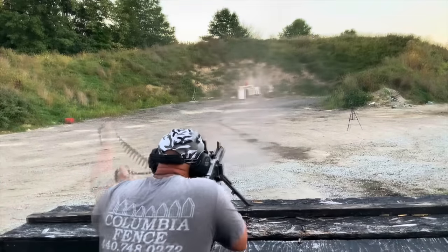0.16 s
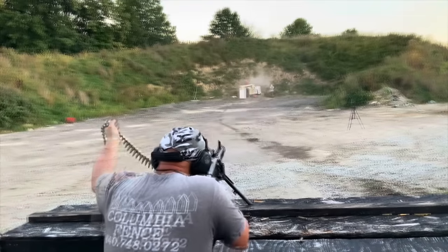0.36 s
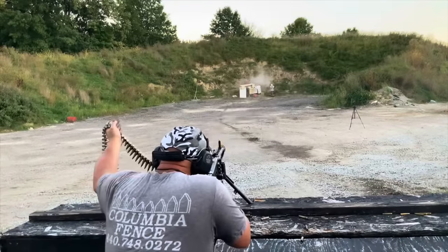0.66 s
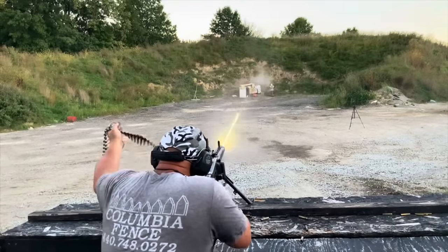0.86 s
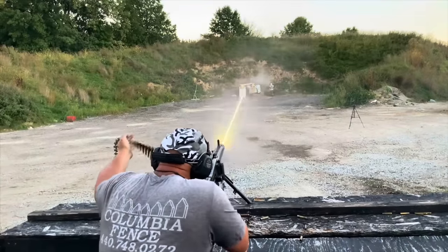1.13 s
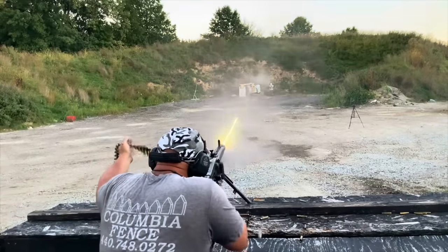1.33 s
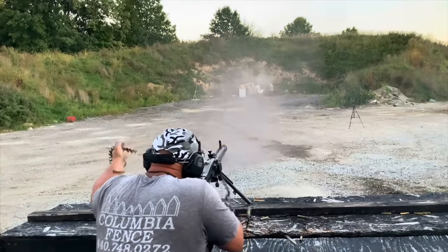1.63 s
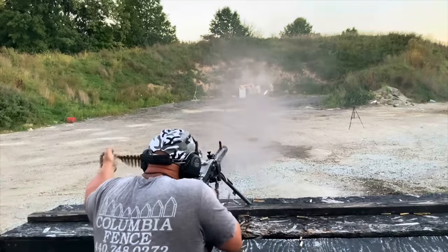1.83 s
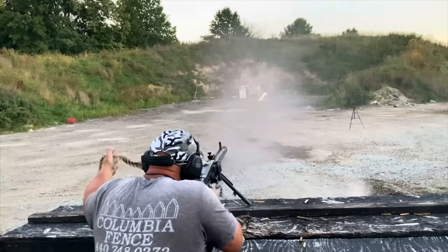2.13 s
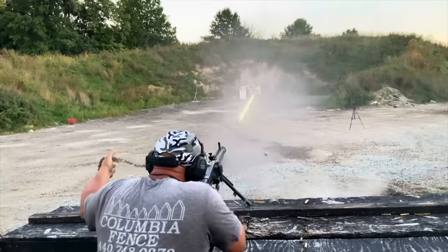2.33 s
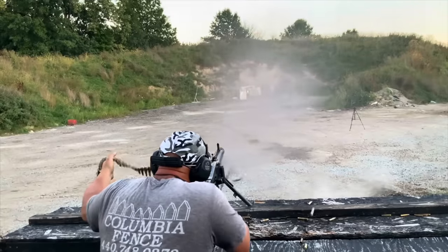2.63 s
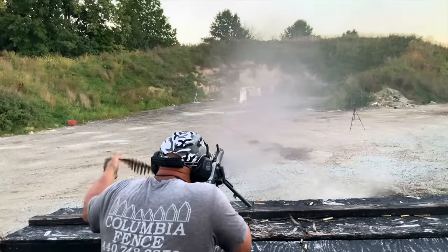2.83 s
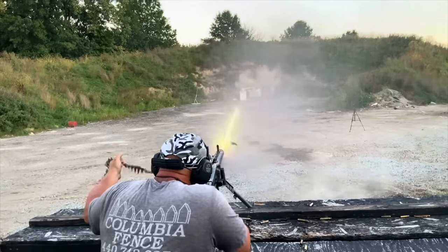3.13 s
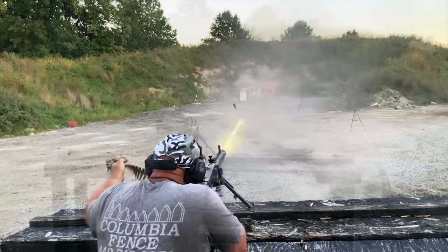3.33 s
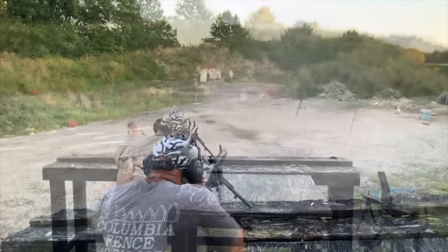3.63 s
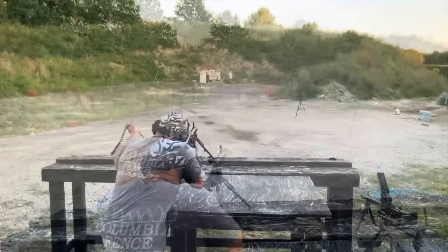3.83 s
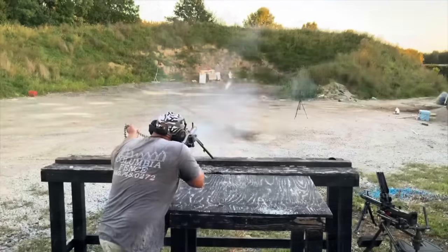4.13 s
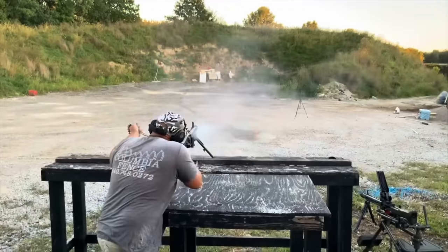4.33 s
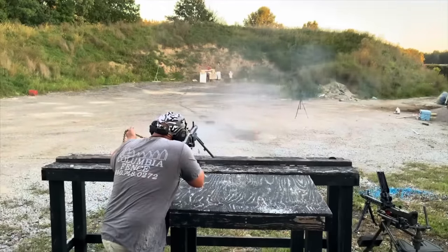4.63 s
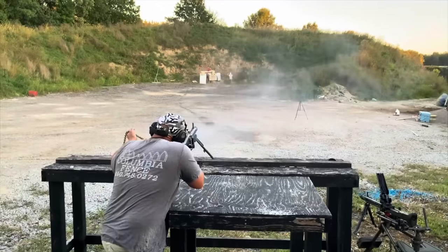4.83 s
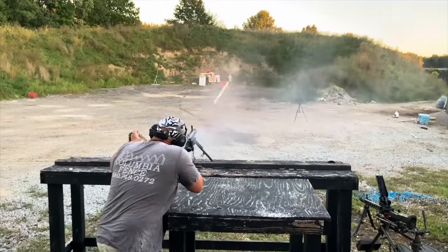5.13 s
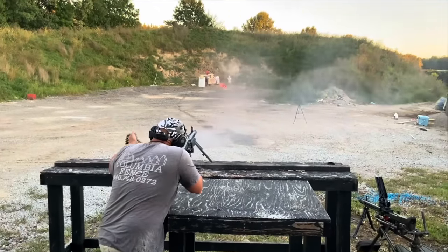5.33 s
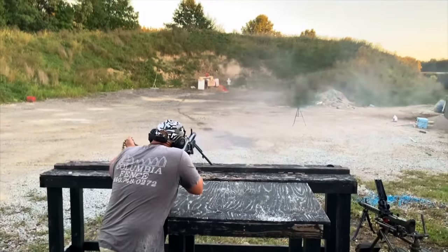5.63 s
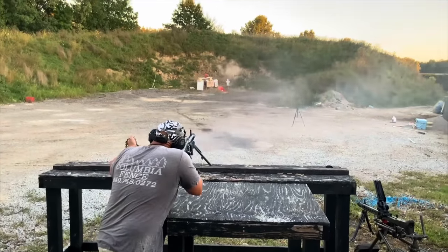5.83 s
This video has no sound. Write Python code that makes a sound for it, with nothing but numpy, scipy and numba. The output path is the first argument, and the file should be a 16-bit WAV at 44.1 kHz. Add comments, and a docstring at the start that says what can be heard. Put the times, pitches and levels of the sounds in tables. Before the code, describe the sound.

Outdoor shooting range, heard in stereo from just behind a belt-fed machine gun. At 0 s the last shot of a burst and its echo off earth banks fade. Small steel clicks come at 0.5 and 0.65 s, then at 0.7 s a sharp crack opens a long burst, about 19 rounds a second. Each round has a hard blast, low thump, gas hiss and bolt clack, with the bench stand ringing; gain control flattens it into a dense, hammering roar, growing thumpier. From 3.2 to 4.2 s it cross-fades to a spot a few metres back, where a short burst ends near 4.25 s. Echoes roll and crackle, with target knocks and a deep swell at 4.5 s. A bright latch snap and clack at 4.8 s lead six quick rounds until 5.1 s, then knocks and a booming swell around 5.3 s. Another click and two rounds begin at 5.85 s.

```python
"""An outdoor range: a belt-fed machine gun fires from a bench, just ahead of us, then from a few metres off.
The end of one close burst cross-fades into a long one, about 19 rounds a second, then into three short bursts.
Each round is shaped noise and decaying sines: a blast that rings the stand, gas hiss and bolt clack.
Scattered noise makes the earth banks' rumble, and struck modes the bullets' knocks on a far target.
Gain control presses each spot into a dense roar over faint open air."""
import sys
import numpy as np
from scipy import signal
from scipy.fft import rfft, irfft, next_fast_len
from scipy.io import wavfile
from scipy.ndimage import uniform_filter1d
from numba import njit

SR = 44100
rng = np.random.default_rng(int(sys.argv[2]) if len(sys.argv) > 2 else 0)


def master(y):
    """Save y as 16-bit WAV."""
    cut = np.clip(np.atleast_2d(y).T, -1, 1)
    pcm = np.round(cut * 32767)  # scale
    wavfile.write(sys.argv[1], SR, pcm.astype(np.int16))


N = 263277
LEAD = SR // 2  # run-in before the heard part, in samples
TOTAL = N + LEAD
TIME = (np.arange(TOTAL) - LEAD) / SR
SIZE = 2 ** 16  # length of a response, in samples
HZ = np.arange(SIZE // 2 + 1) * SR / SIZE
AGE = np.arange(SIZE) / SR  # seconds since the start of a response

TARGET_DELAY_S = .362  # from a shot to its knock on the target
PORT_LAG_S = 34.5 / SR  # treble delay of the left microphone port
TOP_HZ = 15600
ROUND_SPREAD_DB = 1.55  # no two cartridges are quite alike
FIRST_ROUND_DB = -0.5  # the round that opens a close burst is set slightly quieter
LUMP_S = .004  # spacing of the clumps in the banks' reflections
STAND_FADE_DB_PER_S = 1.1  # the stand's notes sink into the roar as a burst goes on

# Most table levels are relative and their layer has its own level; the rumbles' levels are absolute.
# cross-fades between the three stretches of firing: (start [s], length [s])
FADES = [(0.005, 0.57), (3.227, 1)]
# open air: (frequency [Hz], spectrum level [dB])
AIR_COLOUR = [(25, -33), (70, -3), (140, -19), (300, -26), (1000, -21.5), (1900, -31), (3000, -44),
              (15000, -58)]
# deep swells that roll back after a burst: (centre [s], half length [s], level [dB])
RUMBLES = [(.25, 0.11, -33.5), (4.532, 0.11, -26.5), (5.323, 0.13, -23)]
# their bass: (frequency [Hz], spectrum level [dB])
RUMBLE_COLOUR = [(25, -12), (50, -9), (90, 0.5), (150, 3.5), (300, -2), (420, -1.5), (600, -37),
                 (2000, -61)]
# crackling reflections off stones and trunks: (time after the shot [s], level [dB])
CRACKLE_SPAN = [(.02, -40), (.08, -1), (.2, -2), (.35, 0), (.41, -8.5), (.9, -46), (1.4, -90)]
# their tone: (frequency [Hz], spectrum level [dB])
CRACKLE_COLOUR = [(300, -24), (1000, -2), (1650, -2), (2300, -2.5), (2900, -1), (3600, -14), (4600, -5),
                  (15000, -38)]

# the range's answer to one round: (time after the shot [s], level [dB], extra treble [dB])
RANGE_ANSWER = [(0, -5.5, 7.5), (.06, 4.5, -6.5), (.13, 1.5, -40), (.2, -7, 8), (.29, -3, -3.5),
                (.355, 0, -4), (.39, -3.5, -10), (.5, -15, -11), (0.619, -18.5, -15.5), (.9, -30, -14),
                (1.299, -63, -28)]
# tone of the banks' echo: (frequency [Hz], spectrum level [dB])
ECHO_COLOUR = [(15, -60), (25, -36), (108, -9), (223, -8.5), (354, -5), (624, -8.5), (1260, -11),
               (1560, -8), (2280, -10.5), (2760, -10.5), (6920, -10.5), (14800, -26), (16000, -81)]
# separate slaps off the nearer banks: (time after the shot [s], level [dB])
SLAPS = [(0.079, -2), (0.096, -0.5), (.187, -4), (0.263, -0.5)]
# their tone: (frequency [Hz], spectrum level [dB])
SLAP_COLOUR = [(60, -17), (130, -16.5), (250, -8), (390, 1), (550, -17.5), (1500, -34), (3000, -18),
               (6000, -27.5)]
# the struck target: (frequency [Hz], level [dB], t60 [s])
TARGET_MODES = [(1054, -2, 0.05), (1434, -9, 0.078), (1545, -0.5, 0.042), (1716, -1.5, 0.025)]
# bullets that glance off and strike the target again: (time [s], level [dB])
RICOCHETS = [(4.3235, -8), (4.393, -8), (4.456, -7.5), (4.553, 0), (5.247, -1.5), (5.303, 1), (5.359, 3.5)]

# trigger, belt and the bolt running forward, at each spot: (time [s], level [dB], t60 [s])
CLOSE_CLICKS = [(0.497, -22, 0.097), (0.636, -30, 0.19), (0.660, -0.5, 0.49)]
BACK_CLICKS = [(4.789, -12, 0.17), (4.83, 2.5, 0.11), (5.80, -12, 0.19), (5.838, -2, 0.45)]
# tone of the gun's steel: (frequency [Hz], spectrum level [dB])
STEEL_COLOUR = [(100, -47), (700, 1.5), (2000, -3), (5000, -1.5), (9000, 4), (15000, -0.5)]
# resonances of that steel: (frequency [Hz], width [Hz], lift [dB])
STEEL_RINGS = [(3400, 250, -3), (4700, 600, 8), (10300, 780, 1)]
# the feed latch snaps before a burst: (time [s], level [dB])
LATCHES = [(4.835, 1.5)]
# its ring: (frequency [Hz], level [dB], t60 [s])
LATCH_MODES = [(2716, -5, 0.064), (4290, 0, 0.081), (4480, -5, .05), (4710, -3, 0.059), (6616, -8, .07),
               (9400, -17, .06)]

# clear notes each round strikes at each spot, mostly the stand's; the two long high notes further back ring in
# the gun's steel and belt: (frequency [Hz], level [dB], t60 [s])
CLOSE_MODES = [(303, -8, 0.047), (475, -4.5, 0.084), (686, -0.5, 0.093), (803, -4, 0.11), (885, -10, 0.094),
               (1025, -6.5, 0.077), (1647, -5, 0.097)]
BACK_MODES = [(520, -12, .05), (705, 3.5, 0.16), (800, 3, 0.067), (890, -1, 0.19), (1005, -7, 0.17),
              (1105, -2, .07), (1386, -5.5, 0.23), (1460, -7, .12), (1717, -14, 1.25), (2900, -35, 0.63)]
# low thump of the muzzle wave, deep then body: (delay [s], frequency [Hz], level [dB], t60 [s])
CLOSE_THUMP = [(0.0136, 71.3, -7, 0.081), (0.0008, 278, -1, 0.051)]
BACK_THUMP = [(0.0085, 76, -16.5, 0.08), (0.00367, 265.6, 0, 0.044)]
# the thump back off the ground ahead: (delay [s], frequency [Hz], level [dB], t60 [s])
RETURN_THUMP = [(0.035, 153, -4.5, 0.044), (.0395, 279, 0.5, 0.034)]
# the sharp crack that opens a burst, at each spot: (time [s], level [dB])
CLOSE_CRACKS = [(0.690, -9.5)]
BACK_CRACKS = [(3.972, -2), (4.847, -19), (5.851, -19.5)]
# its tone: (frequency [Hz], spectrum level [dB])
CRACK_COLOUR = [(100, -12), (400, -8), (1800, -10.5), (4200, -7.5), (7000, -15), (15000, -20)]
# tone of a report at each spot: (frequency [Hz], spectrum level [dB])
CLOSE_COLOUR = [(25, 2), (66, -0.5), (140, -2.5), (270, -12.5), (560, -7.5), (860, -7), (1150, -5.5),
                (2100, -8.5), (3500, -11.5), (6000, -6.5), (9300, -4.5), (14800, -11.5), (16000, -39)]
BACK_COLOUR = [(15, -58), (25, -35), (87, -6), (127, -17.5), (270, -0.5), (427, 0.5), (531, -9),
               (988, -1.5), (1560, -13), (1700, -14.5), (2410, -11), (2990, -8.5), (3620, -13.5),
               (13200, -15.5), (16000, -27)]
# resonances of stand and gun at each spot: (frequency [Hz], width [Hz], lift [dB])
CLOSE_RINGS = [(82, 10, 15), (121, 35, 0), (273, 153, 10.5), (386, 42, -7.5), (477, 190, 5.5),
               (585, 43, 0.5), (680, 50, 5.5), (801, 61, 7.5), (886.6, 26, 8.5), (1630, 39, 9.5),
               (2098, 150, 9.5), (2256, 104, -4), (2966, 580, 10), (4630, 350, 9)]
BACK_RINGS = [(100.5, 24, 13), (241, 21, 1), (401, 29, -12), (400, 26, 10), (497, 53, 2), (537, 84, 2),
              (713, 33, 9), (802, 39, 6), (895, 97, 8.5), (1014, 58, 6), (1356, 45, 10), (1698, 160, 11),
              (2132, 34, 13), (2925, 13, 17.5)]
# balance as the shooter moves:
# (time [s], deep thump [dB], returned thump [dB], gas hiss [dB], whole sound [dB])
CLOSE_STANCE = [(0, -16, -4, 0.5, -2.5), (1.2, -11.5, -15, 0, -1), (2.2, -3.5, 3.5, 1, 0.5),
                (3.199, 3, 0.5, 1.5, 3), (3.9, 1.5, 8.5, 1.5, 3)]

# rounds of the two close bursts, stumbling when the belt drags: (time [s])
ENDING_ROUNDS = [-.286, -.231, -.176, -.123, -.071, -.021, .029]
LONG_ROUNDS = [0.7092, 0.7679, 0.8224, 0.8782, 0.9319, 0.9853, 1.0355, 1.0859, 1.138, 1.1887, 1.242, 1.296,
               1.348, 1.398, 1.4467, 1.5012, 1.5524, 1.6048, 1.6555, 1.7066, 1.7598, 1.8119, 1.8608, 1.9144,
               1.9655, 2.0195, 2.071, 2.1228, 2.1736, 2.2248, 2.2796, 2.3324, 2.3846, 2.437, 2.4925, 2.5458,
               2.5999, 2.6608, 2.7147, 2.7651, 2.8221, 2.8774, 2.934, 2.9877, 3.0389, 3.0927, 3.1448,
               3.1957, 3.2471, 3.2993, 3.3497, 3.4033, 3.4558, 3.5081, 3.5611, 3.6123, 3.6625, 3.7138,
               3.7666, 3.8179, 3.869, 3.9252]
# rounds from further back: (time [s], level [dB], hard front [dB], echo [dB])
BACK_ROUNDS = [(3.981, -10, -11, 0), (4.0425, -6.5, -7, 0.5), (4.106, -0.5, -3, 3.5),
               (4.1688, -1.5, -0.5, 2), (4.2489, -1.5, 0, 3.5), (4.85, -12, -22, -6),
               (4.904, -11, -16.5, -11), (4.9568, -11, -14.5, -3.5), (5.009, -12, -14, -3),
               (5.0648, -11.5, -17, 0), (5.1203, -10.5, -16, -0.5), (5.856, -14, -37, -2.5),
               (5.92, -9.5, -18, -1)]
# likeness of the two microphone ports: (frequency [Hz], correlation [0-1])
LIKENESS = [(60, 0.93), (130, 0.76), (260, 0.79), (500, 0.4), (1000, 0.01), (2000, 0.28), (4000, 0),
            (7500, 0.23), (10000, 0.96), (15000, .97)]


def undb(db):
    """Decibels to gain."""
    return 10 ** (np.asarray(db) / 20)


def curve(points, hz):
    """Read (frequency [Hz], value) points on a log-frequency axis."""
    f, value = np.transpose(points)
    return np.interp(np.log(hz + 1), np.log(f), value)


def colour(points, rings=()):
    """A spectrum in dB with resonant bumps and the subsonic part rolled off."""
    bumps = sum(db / (1 + (2 * (HZ - hz) / width) ** 2) for hz, width, db in rings)
    return curve(points, HZ) + bumps - 10 * np.log10(1 + (20 / (HZ + 1)) ** 4)


def shaped(x, db):
    """Causal minimum-phase filter with the given dB gain, built from the cepstrum."""
    cepstrum = irfft(np.log(undb(db)))
    cepstrum[1:SIZE // 2] *= 2
    cepstrum[SIZE // 2 + 1:] = 0
    return irfft(rfft(x, SIZE) * np.exp(rfft(cepstrum)))


def unit(x):
    """Scale a response to unit energy."""
    return x / np.sqrt(np.sum(x ** 2))


def play(x, response):
    """Convolve with a response."""
    return signal.fftconvolve(np.atleast_2d(x), np.atleast_2d(response), axes=1)[:, :TOTAL]


def fall(t60):
    """An exponential decay, 60 dB down after t60 seconds."""
    return undb(-60 * AGE / t60)


def rise(seconds):
    """A soft exponential onset."""
    return 1 - np.exp(-AGE / seconds)


def scatter(envelope, db):
    """Two unrelated responses of dense reflections under an envelope, evened out to a colour."""
    pair = []
    for x in rng.standard_normal((2, SIZE)) * envelope:
        own_db = 10 * np.log10(uniform_filter1d(np.abs(rfft(x)) ** 2, size=70) + 1e-9)
        pair.append(unit(shaped(x, db - own_db)))
    return np.array(pair)


def noise(db):
    """Two unrelated coloured noises of rms about 1."""
    response = unit(shaped(np.ones(1), db))
    return play(rng.standard_normal((2, TOTAL)), response)


def strikes(rows, delay=0):
    """One impulse for each (time [s], level [dB]) row."""
    x = np.zeros(TOTAL + SIZE)
    for s, db in rows:
        x[LEAD + int((s + delay) * SR)] += undb(db)
    return x[:TOTAL]


def puffs(hits, envelope, db):
    """Fresh noise under one envelope for each hit; overlapping puffs add in power."""
    return np.sqrt(np.abs(play(hits ** 2, envelope ** 2))) * noise(db)


def ringing(hits, modes, rise_s):
    """Struck decaying sines of unit energy; in the diffuse part each sine starts at its own random phase."""
    turns = rng.uniform(0, 2 * np.pi, len(modes))
    pair = 0
    for (hz, db, t60), turn in zip(modes, turns):
        phases = np.array([[0], [turn]])
        pair = pair + undb(db) * fall(t60) * np.sin(2 * np.pi * hz * AGE + phases)
    return play(hits, unit(pair * rise(rise_s)))


def lumps(lump_db):
    """Uneven ground reflects in clumps a few milliseconds long."""
    knots = np.arange(0, AGE[-1], LUMP_S)
    return undb(lump_db * np.interp(AGE, knots, np.tanh(rng.standard_normal(len(knots)))))


def background(air_db, hum_db, hum_hz):
    """Open air as noise, and a low steady sine hum near the bench, returned apart."""
    hum = np.sin(2 * np.pi * hum_hz * TIME) * np.array([[1], [0]])  # shared part only
    return undb(air_db) * noise(colour(AIR_COLOUR)), undb(hum_db) * hum


def rumble():
    """The echoes of a whole burst pile up in one swell of bass noise, in the shared part only."""
    swell = sum(undb(db) * np.exp(-((TIME - s) / length) ** 4) for s, length, db in RUMBLES)
    return swell * noise(colour(RUMBLE_COLOUR)) * np.array([[1], [0]])


def crackle(shots, crackle_db, per_s, spread_db):
    """Stones and trunks return each report as separate little cracks at random instants."""
    span = undb(np.interp(AGE, *np.transpose(CRACKLE_SPAN)))
    swell = np.sqrt(np.abs(play(strikes(shots) ** 2, span ** 2)))
    present = rng.random((2, TOTAL)) < per_s / SR
    grains = present * undb(spread_db * rng.uniform(-0.9, 0, (2, TOTAL)))
    response = scatter(fall(0.026), colour(CRACKLE_COLOUR))
    return undb(crackle_db) * swell * play(grains / grains.std(), response)


def earth_banks(shots, echo_db, boom_db):
    """Banks and trees return each blast as dense reflections whose treble changes with delay."""
    s, db, treble_db = np.transpose(RANGE_ANSWER)
    tone = colour(ECHO_COLOUR, [(98, 9.8, boom_db), (2300, 94, -9), (2770, 550, 3.5)])
    banks = scatter(undb(np.interp(AGE, s, db)) * lumps(lump_db=5.0), tone)
    bass = signal.sosfiltfilt(signal.butter(2, 2200, fs=SR, output="sos"), banks)
    banks = bass + (banks - bass) * undb(np.interp(AGE, s, treble_db))
    return undb(echo_db) * play(strikes(shots), banks)


def bank_slaps(shots, slap_db):
    """Each nearer bank throws back one short, distinct slap of every shot."""
    slaps = 0
    for s, db in SLAPS:
        response = scatter(fall(0.071) * rise(0.001), colour(SLAP_COLOUR))
        slaps = slaps + undb(db) * play(strikes(shots, s), response)
    return undb(slap_db) * slaps


def target(shots, target_db, splash_db, ricochets):
    """Each bullet strikes the target's modes and throws up a short puff of grit."""
    arrivals = strikes(shots, TARGET_DELAY_S) + strikes(ricochets)
    knocks = undb(target_db) * ringing(arrivals, TARGET_MODES, rise_s=0.0034)
    tone = colour([(200, -32), (1400, 2.5), (2200, -11), (4500, -12), (12000, -16.5), (16000, -27)])
    return knocks + undb(splash_db) * puffs(arrivals, fall(0.014) * rise(0.0011), tone)


def downrange(shots, echo_db, boom_db, slap_db, target_db, splash_db, ricochets=()):
    """What comes back from the range: bank echo, slaps and target hits."""
    echoes = earth_banks(shots, echo_db, boom_db) + bank_slaps(shots, slap_db)
    return echoes + target(shots, target_db, splash_db, ricochets)


def action(clicks, click_db, rise_s):
    """Steel parts snap and slide before a burst: resonant noise in decaying bursts."""
    envelope = 0
    for s, db, t60 in clicks:
        onset = np.clip((TIME - s) / rise_s, 0, 1)
        envelope = envelope + undb(db - 60 * np.abs(TIME - s) / t60) * onset
    return undb(click_db) * envelope * noise(colour(STEEL_COLOUR, STEEL_RINGS))


def stand(shots, ring_db, vary_db):
    """Each blast strikes two sets of the stand's notes a little differently."""
    hits = strikes(shots) * undb(ring_db - STAND_FADE_DB_PER_S * (TIME - shots[0][0]))
    notes = 0
    for k in (0, 1):
        varied = hits * undb(vary_db * rng.standard_normal(TOTAL))
        notes = notes + ringing(varied, CLOSE_MODES[k::2], rise_s=0.0029)
    return notes


def thumps(shots, modes, thump_db, depth=1):
    """The muzzle wave gives a few low cycles, deep and body, in the shared part only."""
    pulses = []
    for s, hz, db, t60 in modes:
        cycles = unit(fall(t60) * rise(0.0044) * np.sin(2 * np.pi * hz * AGE))
        pulses.append(undb(db) * play(strikes(shots, s), cycles))
    deep, body = pulses
    return undb(thump_db) * (depth * deep + body) * np.array([[1], [0]])


def cracks(rows, crack_db, peak_s):
    """The first round of a burst breaks in with a short, bright puff of noise."""
    envelope = (AGE / peak_s * np.exp(1 - AGE / peak_s)) ** 2
    return undb(crack_db) * puffs(strikes(rows), envelope, colour(CRACK_COLOUR))


def punch(shots, tone, punch_db, low_hz, high_hz, delay_s, hold_s):
    """The pressure front bounces between bench, ground and roof, then is gone; alike on every round."""
    band_db = tone - 10 * np.log10((1 + (HZ / high_hz) ** 8) * (1 + (low_hz / (HZ + 1)) ** 6))
    envelope = rise(0.0005) / (1 + (AGE / hold_s) ** 10)
    return undb(punch_db) * play(strikes(shots, delay_s), scatter(envelope, band_db))


def bolt_clack(fronts, bolt_db, bolt_s):
    """The bolt hits its rear stop just after each shot: a short noise puff."""
    tone = colour([(200, -53), (1000, -1), (2000, 4.0), (3200, -3.5), (14000, -13), (16000, -2.5)])
    return undb(bolt_db) * puffs(strikes(fronts, bolt_s), fall(0.063) * rise(0.0021), tone)


def reports(shots, fronts, tone, t60, rise_s, blast_db, scatter_db, low_hz,
            gas_db, gas_t60, gas_hz, snap_db, snap_t60, lead_s, bolt_db, bolt_s):
    """The blast rings the stand alike on every round; turbulence, snap, gas and bolt differ."""
    hits = strikes(shots)
    band_db = tone - 10 * np.log10((1 + (HZ / gas_hz) ** 4) * (1 + (low_hz / (HZ + 1)) ** 4))
    high_db = tone - 10 * np.log10(1 + (gas_hz / (HZ + 1)) ** 2)
    # reflections from bench, ground and roof pile up within a few milliseconds
    envelope = fall(t60) * rise(rise_s)
    blast = undb(blast_db) * play(hits, scatter(envelope, band_db))
    turbulence = undb(scatter_db) * puffs(hits, envelope, band_db)
    gas = undb(gas_db) * puffs(hits, fall(gas_t60) * rise(0.0014), high_db)
    snap_envelope = fall(snap_t60) * rise(0.0015)
    snap = undb(snap_db) * puffs(strikes(fronts, -lead_s), snap_envelope, high_db)
    return blast + turbulence + gas + snap + bolt_clack(fronts, bolt_db, bolt_s)


def rounds(times, db):
    """A burst as (time [s], level [dB]) rows: levels vary, and the first is set slightly lower."""
    strong = rng.standard_normal(len(times))
    return [(s, db + ROUND_SPREAD_DB * strong[k] + FIRST_ROUND_DB * (k == 0))
            for k, s in enumerate(np.ravel(times))]


@njit
def follow(x, attack, release):
    """Envelope with separate smoothing for rising and sinking."""
    out, e = np.empty(len(x)), 0.
    for i in range(len(x)):
        e += (x[i] - e) * (attack if x[i] > e else release)
        out[i] = e
    return out


def gain_control(x, top_db, attack_s, release_s):
    """Turn the sound down smoothly as its envelope nears and passes the top."""
    level = np.sqrt(np.mean(x ** 2, axis=0))
    e = follow(level, 1 / (1 + attack_s * SR), 1 / (1 + release_s * SR))
    return x / np.sqrt(1 + (e / undb(top_db)) ** 2)


def close_spot(times, burst_db, target_db):
    """One burst from just behind the shooter; fast gain control flattens rounds, slow eases the burst."""
    shots = rounds(times, burst_db)
    s, *columns = np.transpose(CLOSE_STANCE)
    deep_db, return_db, hiss_db, level_db = (np.interp(TIME, s, c) for c in columns)
    tone = colour(CLOSE_COLOUR, CLOSE_RINGS)
    x = reports(shots, shots, tone, t60=0.56, rise_s=0.00078, blast_db=24.5, scatter_db=-13, low_hz=200,
                gas_db=hiss_db - 10, gas_t60=0.66, gas_hz=2420,
                snap_db=hiss_db - 4.5, snap_t60=.07, lead_s=0.0029, bolt_db=2.5, bolt_s=0.0247)
    x = x + punch(shots, tone, punch_db=21, low_hz=205, high_hz=1560, delay_s=0, hold_s=0.019)
    x = x + stand(shots, ring_db=22.5, vary_db=1.5)
    x = x + thumps(shots, RETURN_THUMP, thump_db=return_db + 9.5)
    x = x + thumps(shots, CLOSE_THUMP, thump_db=17.0, depth=undb(deep_db))
    x = x + cracks(CLOSE_CRACKS, crack_db=9, peak_s=0.011)
    x = x + downrange(shots, echo_db=25, boom_db=2.0, slap_db=11.5, target_db=target_db, splash_db=-4.0)
    x = gain_control(x, top_db=-6.5, attack_s=0.0013, release_s=0.088)
    return gain_control(x, top_db=-16.5, attack_s=0.33, release_s=0.67) * undb(level_db)


def back_spot():
    """A few metres back: three short bursts and their echoes under gain control, with latch and clicks."""
    shots, fronts, echoes = ([(row[0], row[k]) for row in BACK_ROUNDS] for k in (1, 2, 3))
    tone = colour(BACK_COLOUR, BACK_RINGS)
    x = reports(shots, fronts, tone, t60=0.57, rise_s=0.0013, blast_db=31.5, scatter_db=-13.0, low_hz=170,
                gas_db=-5.5, gas_t60=0.59, gas_hz=2510,
                snap_db=-0.5, snap_t60=0.1, lead_s=.001, bolt_db=8, bolt_s=0.016)
    x = x + punch(fronts, tone, punch_db=28.0, low_hz=180, high_hz=1800, delay_s=0.00217, hold_s=0.02)
    x = x + undb(25.5) * ringing(strikes(shots, 0.00201), BACK_MODES, rise_s=0.0027)
    x = x + thumps(shots, BACK_THUMP, thump_db=23.5)
    x = x + cracks(BACK_CRACKS, crack_db=1, peak_s=0.0047)
    x = x + downrange(echoes, echo_db=26.5, boom_db=4.0, slap_db=15.5, target_db=13.5, splash_db=-6.5,
                      ricochets=RICOCHETS)
    x = x + crackle(echoes, crackle_db=-27, per_s=60, spread_db=6)
    pressed = gain_control(x, top_db=-8.5, attack_s=0.0021, release_s=0.2)
    latch = undb(9.5) * ringing(strikes(LATCHES), LATCH_MODES, rise_s=.003)
    return pressed + latch + action(BACK_CLICKS, click_db=-17.0, rise_s=0.018)


def ports(pair):
    """Mix shared and diffuse parts to left and right; in the treble the left is late and inverted."""
    shared, diffuse = rfft(pair, next_fast_len(TOTAL + 1) * 2)
    hz = np.linspace(0, SR / 2, len(shared))
    likeness = np.clip(curve(LIKENESS, hz), 0, .99)
    shared = shared * np.sqrt((1 + likeness) / 2)
    diffuse = diffuse * np.sqrt((1 - likeness) / 2)
    # starts after one and a half cycles of lag, hence the inversion
    turn = np.exp(-2j * np.pi * np.maximum(hz * PORT_LAG_S - 1.5, 0))
    lean_db = curve([(60, 1.0), (250, -3.5), (550, -2.5), (1000, 2.3), (2000, -3.0), (4000, 0.1)], hz)
    left = (shared + diffuse) * turn * undb(lean_db / 2)
    right = (shared - diffuse) * undb(-lean_db / 2)
    return irfft(np.array([left, right]))[:, :TOTAL]


def scene():
    """The end of one close burst fades into a very long one, and that into the spot further back."""
    first, second = (np.clip((TIME - s) / length, 0, 1) for s, length in FADES)
    air, hum = background(air_db=-48.5, hum_db=-46.5, hum_hz=70.7)
    ending = close_spot(ENDING_ROUNDS, burst_db=4.5, target_db=16.5)
    long_burst = close_spot(LONG_ROUNDS, burst_db=5.0, target_db=14.5)
    opening = action(CLOSE_CLICKS, click_db=-21.5, rise_s=0.0023)
    close = (1 - first) * ending + first * (1 - second) * (opening + long_burst + hum)
    mix = close + second * back_spot()
    return ports(mix + rumble() + air)[:, LEAD:]


def record(dry):
    """Round the highest peaks softly, then cut the top with a steep low-pass."""
    low_pass = signal.ellip(8, .2, 70, TOP_HZ, fs=SR, output="sos")
    return signal.sosfilt(low_pass, np.tanh(dry))


dry = scene()
out = record(dry)
master(out)
```